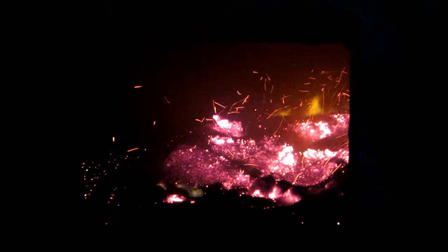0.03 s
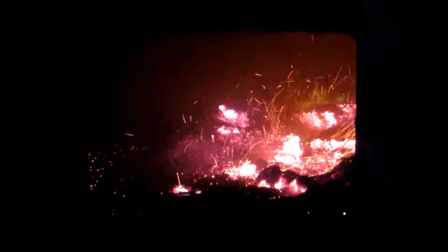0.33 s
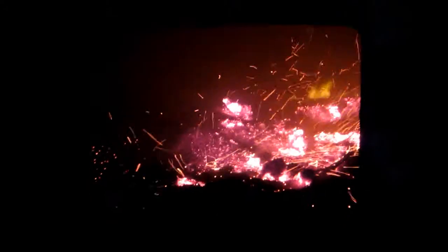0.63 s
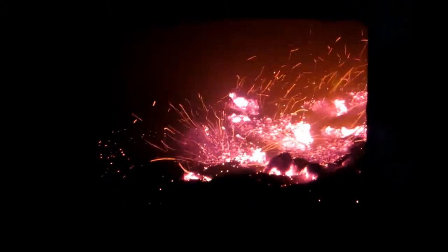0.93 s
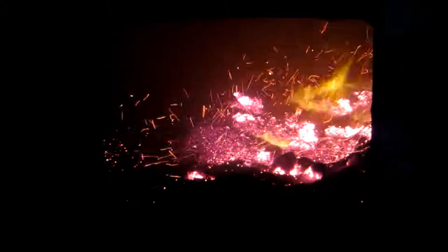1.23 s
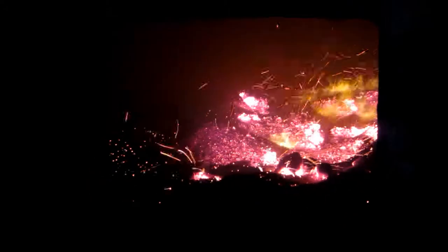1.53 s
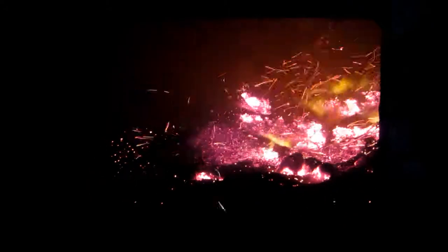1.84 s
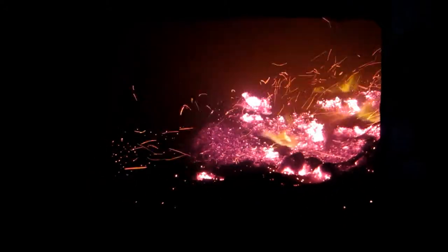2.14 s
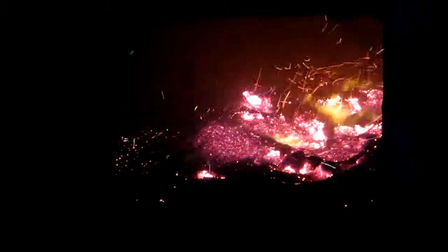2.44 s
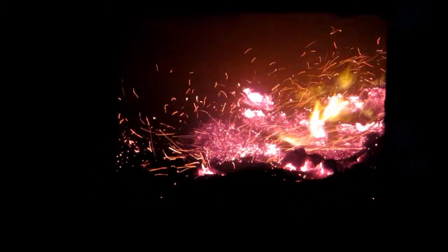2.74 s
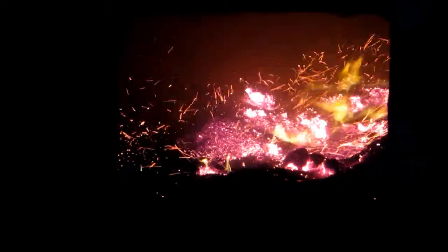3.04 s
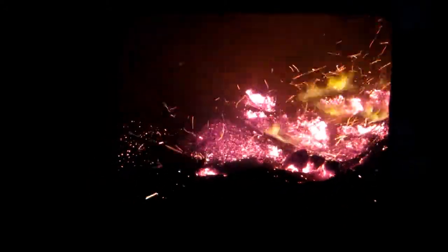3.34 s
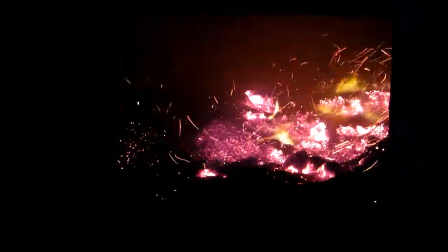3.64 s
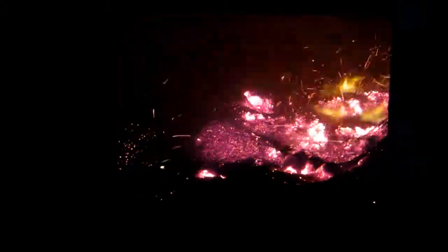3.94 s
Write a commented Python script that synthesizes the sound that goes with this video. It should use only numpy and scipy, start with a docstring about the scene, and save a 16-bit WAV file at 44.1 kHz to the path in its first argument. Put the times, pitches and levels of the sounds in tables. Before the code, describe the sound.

A furnace roars loudly and steadily as air is forced through the fire, heard at its open door inside a mill. A low blower hum, a hollow drone and faint machine whines run underneath throughout.

```python
"""Forced draught in a furnace

At the open door of a mill's solid-fuel furnace, air driven through the burning bed makes a broadband roar.
The turbulence excites resonances of the firebox and ducts; the blower hums and machines whine nearby.
The sound cuts in abruptly, on two microphones of opposite polarity, the right one louder."""
import sys
import numpy as np
from scipy import signal
from scipy.fft import rfft, irfft
from scipy.io import wavfile
from scipy.ndimage import uniform_filter1d

SR = 44100
rng = np.random.default_rng(int(sys.argv[2]) if len(sys.argv) > 2 else 0)


def generate_wav(sig):
    """Save sig (samples, or channels by samples) to the path in sys.argv[1] as 16-bit PCM at SR."""
    pcm = np.round(np.clip(np.atleast_2d(sig).T, -1, 1) * 32767).astype(np.int16)
    wavfile.write(sys.argv[1], SR, pcm)


N = 176400

# continuous spectrum of the fire's turbulence: f/Hz, spectral density level/dB
ROAR_SPECTRUM = [(20.0, -79), (42.0, -59.5), (62.0, -54.5), (90.0, -44.5), (190.0, -48.5), (330.0, -50.5),
                 (560.0, -50.5), (1000.0, -52), (1520.0, -54.5), (1750.0, -60.5), (2600.0, -65),
                 (3700.0, -74.5), (6000.0, -81.5), (8500.0, -88.5), (10300.0, -96.5), (11000.0, -104.2),
                 (12000, -110), (15000, -106)]
# resonances of the firebox and ducts: f/Hz, bandwidth/Hz, peak spectral density level/dB
FIREBOX_MODES = [(74.0, 4.0, -42), (101.0, 14.0, -40.2), (123, 14, -42), (150.0, 8.0, -38.0),
                 (176, 8, -44.5), (236.0, 28.0, -42.3), (272, 7, -41.5), (312.0, 30.0, -43.3),
                 (358.0, 22.0, -42), (392, 8, -45), (431.0, 8.0, -44), (503.0, 30.0, -44.3), (670, 25, -51),
                 (825, 30, -52), (1040, 25, -52), (1095.0, 26.0, -49.5), (1246.0, 40.0, -46.8),
                 (1374.0, 30.0, -49.3), (1512.0, 60.0, -49.8), (1678, 30, -57), (1885.0, 174.0, -60.5),
                 (2521.0, 73.0, -61.7), (3230, 260, -73)]
# strength of the draught: t/s, level/dB
DRAUGHT_LEVEL = [(0.1, 2.3), (0.25, 1.0), (0.55, -0.5), (0.66, 1.7), (0.72, -0.8), (0.8, 0.4), (1.14, 0.7),
                 (1.3, -0.1), (1.62, 0.3), (1.9, -0.05), (2.35, -0.4), (2.52, 1), (2.65, 1.5), (2.74, -0.3),
                 (2.88, 0.4), (3.1, -0.84), (3.97, -0.5)]
# response of the roar to the draught: f/Hz, sensitivity/(dB per dB)
DRAUGHT_SENSITIVITY = [(80, 1.4), (280, 0.66), (600, 1.66), (1500, 1.0), (8000, 1.5)]
# rise and fall of the roar's low body: t/s, gain/dB
BODY_GAIN = [(0.1, 0.6), (0.5, -1.2), (0.8, 0.3), (1.5, 0.4), (2.25, 0.3), (2.55, -0.6), (2.8, -0.6),
             (3.4, -0.4), (3.97, -0.9)]
# brief throaty swells of the flames: t/s, duration/s, centre f/Hz, gain/dB
FLAME_FLARES = [(0.48, 0.06, 110, 3), (0.64, 0.1, 100, 5), (1.0, 0.1, 235, 4), (1.67, 0.09, 280, 5),
                (2.05, 0.07, 250, 4)]
# a duct's close pair of resonances: f/Hz, bandwidth/Hz, peak spectral density level/dB
DUCT_MODES = [(718, 14, -43.8), (747, 18, -43.8)]
# coming and going of that duct's ring: t/s, gain/dB
DUCT_GAIN = [(0.1, 2.5), (0.45, 1), (0.75, -1), (1.1, -1), (1.3, -5), (1.41, 3.5), (1.53, -5), (1.66, 1),
             (1.92, -1.5), (2.35, 1.5), (2.58, -2), (2.68, 3), (3.02, -4), (3.12, 4), (3.25, -1),
             (3.42, -4), (3.55, 0), (3.85, 2), (3.97, -2)]
# rise and fall of the blower's hum: t/s, gain/dB
HUM_GAIN = [(0.1, 2.5), (0.26, 2), (0.4, -2), (0.9, -2), (1.2, -0.5), (1.4, -1.5), (1.7, 0), (1.85, -3),
            (2.1, 1), (2.55, -0.5), (2.7, -2), (3.1, -1), (3.4, 1.5), (3.6, -1), (3.8, 1.5), (3.97, -4)]
# strength of a hollow machine drone: t/s, level/dB
DRONE_ENVELOPE = [(0.1, -26), (0.7, -32), (1.0, -24.5), (1.3, -27.5), (1.8, -25), (2.3, -30.5), (3.0, -30),
                  (3.97, -28)]
# tones of the nearby machines: f/Hz, width of pitch wander/Hz, relative level/dB
MACHINE_WHINES = [(605.8, 6.0, -36.6), (1217.6, 4.0, -36.0), (1460.0, 6.5, -32.6), (1768.1, 7.0, -45.4),
                  (2030.7, 3.0, -47.0), (2447.5, 8.0, -47.5), (8519.1, 19.0, -67.0)]
# likeness of the noise at the two microphones: f/Hz, correlation (0 to 1)
MIC_CORRELATION = [(300, 1), (1200, 1), (2500, 1), (4500, 0.99), (8000, 0.56), (11000, .45), (14000, .25)]
# left microphone relative to the right: f/Hz, gain/dB
LEFT_MIC_GAIN = [(60, -7.0), (110, -7.5), (200, -7.5), (380, -7.5), (700, -7.5), (1290, -7.5), (2380, -8.0),
                 (4400, -9.5), (8120, -11.5), (15000, -11.0)]
# left microphone relative to the right, polarity aside: f/Hz, phase/rad
LEFT_MIC_PHASE = [(200, 0), (800, -.11), (1600, -.47), (3200, -.85), (6200, -1.2), (11000, -1.45)]

TIME, FREQS = np.arange(N) / SR, np.fft.rfftfreq(N, 1 / SR)
START_S, CUTOFF_HZ = .0725, 15500
BODY_HZ, BODY_OCTAVES, FLARE_OCTAVES = 257, 0.57, 0.45
FLUTTER_DB, FLUTTER_HZ, PATCH_DB = 0.46, 35, 0.5
HUM_HZ, HUM_DB = 121.2, -23.4
DRONE_HZ, WHINE_GAIN_DB = 212.8, -0.5


def amp(db):
    """Amplitude ratio: a factor of ten for every 20 dB."""
    return 10 ** (np.asarray(db) / 20)


def at_frequency(table, hz):
    """Interpolation on a logarithmic frequency axis."""
    f, value = np.transpose(table)
    return np.interp(np.log(hz + 1), np.log(f + 1), value)


def at_time(table, t=TIME):
    """Linear interpolation in time."""
    return np.interp(t, *np.transpose(table))


def band(hz, centre_hz, octaves):
    """A Gaussian weighting in log frequency, as a column."""
    return np.exp(-(np.log2((hz + 1) / centre_hz) / octaves) ** 2)[:, None]


def drift(rate_hz):
    """Low-pass noise: a random fluctuation of unit variance, up to about the given rate."""
    low_pass = np.exp(-(FREQS / rate_hz) ** 2) * (FREQS > 0)
    x = irfft(rfft(rng.standard_normal(N)) * low_pass, N)
    return x / (x.std() + 1e-12)


def turbulence(modes, floor=0):
    """Random forcing of resonators: two independent noises with peaks over a floor of power per Hz."""
    power = floor + sum(amp(db) ** 2 / (1 + (np.sqrt(2) - 1) * (2 * (FREQS - centre) / width) ** 2) ** 2
                        for centre, width, db in modes)
    return irfft(rfft(rng.standard_normal((2, N))) * np.sqrt(power * SR / 2), N)


def tone(hz, level_db, wander_hz, waver_db, rate_hz):
    """Random frequency and amplitude modulation of a sinusoid of given r.m.s. level."""
    cycles = np.cumsum(hz + wander_hz * drift(rate_hz)) / SR + rng.random()
    swell = amp(waver_db * drift(rate_hz))
    return amp(level_db) * np.sqrt(2 / np.mean(swell ** 2)) * swell * np.sin(2 * np.pi * cycles)


def fire():
    """Turbulent combustion noise, coloured by resonance and modulated by the draught; two signals."""
    roar = turbulence(FIREBOX_MODES, floor=amp(at_frequency(ROAR_SPECTRUM, FREQS)) ** 2)
    f, t, spectra = signal.stft(roar, SR, nperseg=512, noverlap=384)
    draught = at_time(DRAUGHT_LEVEL, t)
    flutter = np.interp(t, TIME, drift(FLUTTER_HZ))
    # noise smoothed over time, then frequency, makes each region of the spectrum flicker separately
    patches = uniform_filter1d(rng.standard_normal((len(t), len(f))), size=30, axis=0)
    patches = uniform_filter1d(patches, size=7, axis=1).T
    gain_db = at_frequency(DRAUGHT_SENSITIVITY, f)[:, None] * (draught - draught.mean())
    gain_db += FLUTTER_DB * flutter + PATCH_DB * patches / patches.std()
    gain_db += band(f, BODY_HZ, BODY_OCTAVES) * at_time(BODY_GAIN, t)
    for when, duration, centre, db in FLAME_FLARES:
        gain_db += db * band(f, centre, FLARE_OCTAVES) * np.exp(-(2 * (t - when) / duration) ** 2)
    return signal.istft(spectra * amp(gain_db), SR, nperseg=512, noverlap=384)[1][:, :N]


def duct():
    """Flow-excited resonance: the air stream drives a hollow ring that comes and goes; two signals."""
    return turbulence(DUCT_MODES) * amp(at_time(DUCT_GAIN))


def blower():
    """Tonal fan noise: a low hum, modulated by the air stream."""
    return tone(HUM_HZ, HUM_DB, wander_hz=1.2, waver_db=2.2, rate_hz=9) * amp(at_time(HUM_GAIN))


def machines():
    """Superposition of unsteady tones: a hollow drone and thin whines from the rest of the mill."""
    drone = tone(DRONE_HZ, 0, wander_hz=2, waver_db=2, rate_hz=7.8) * amp(at_time(DRONE_ENVELOPE))
    whines = sum(tone(hz, db + WHINE_GAIN_DB, wander_hz=width / 2, waver_db=2.5, rate_hz=7.5)
                 for hz, width, db in MACHINE_WHINES)
    return drone + whines


def scene():
    """Partial coherence: the microphones share the bass and tones, but less of the treble noise."""
    near, diffuse = fire() + duct()
    tones = blower() + machines()
    correlation = at_frequency(MIC_CORRELATION, FREQS)
    left_spectrum = correlation * rfft(near) + np.sqrt(1 - correlation ** 2) * rfft(diffuse) + rfft(tones)
    left_gain = amp(at_frequency(LEFT_MIC_GAIN, FREQS))
    left_phase = at_frequency(LEFT_MIC_PHASE, FREQS)
    left = irfft(left_spectrum * left_gain * np.exp(1j * left_phase), N)
    return np.array([left, near + tones])


def record(dry):
    """Polarity inversion of the left channel, then an abrupt switch-on and low-pass filtering of both."""
    gated = np.array([-dry[0], dry[1]]) * (TIME >= START_S)
    low_pass = signal.firwin(511, CUTOFF_HZ, window=("kaiser", 9), fs=SR)
    return signal.oaconvolve(gated, low_pass[None], "same")


dry = scene()
out = record(dry)
generate_wav(out)
```